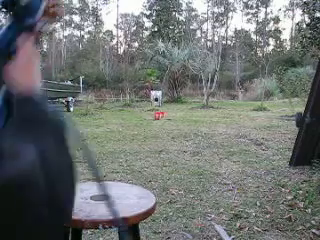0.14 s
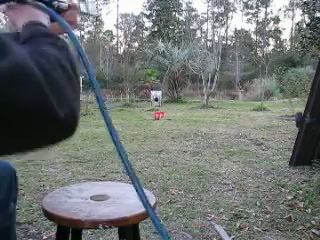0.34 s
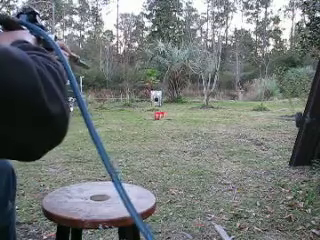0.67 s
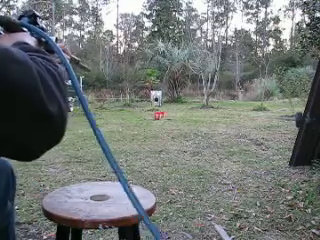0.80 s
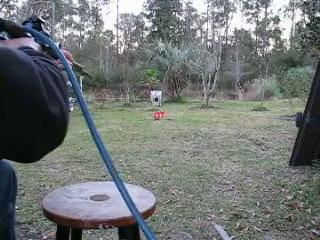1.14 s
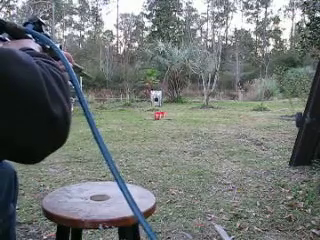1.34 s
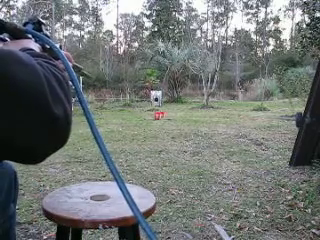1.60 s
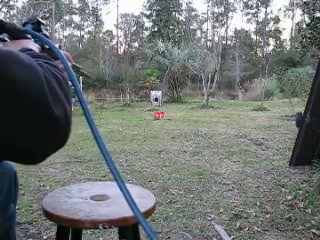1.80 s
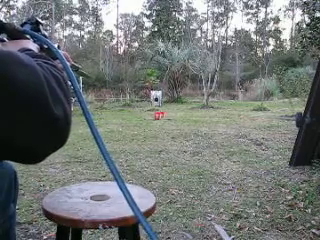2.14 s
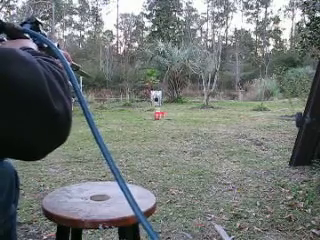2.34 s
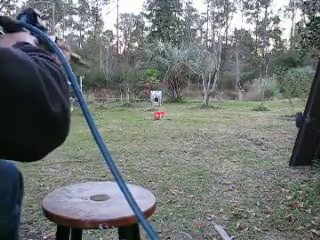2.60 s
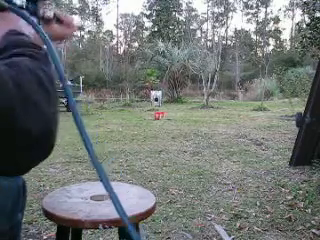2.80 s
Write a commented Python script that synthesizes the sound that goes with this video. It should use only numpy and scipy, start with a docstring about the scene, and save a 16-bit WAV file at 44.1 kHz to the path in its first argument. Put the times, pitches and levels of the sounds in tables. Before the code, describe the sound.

Air cannon shot: a crack and overloaded hissing burst, a hollow can knock, echo off trees

```python
"""A home-made air cannon fires: a crack, then a whistling jet of noise that overloads the capsules.
The shot strikes the ringing modes of a hollow can, which rolls away as a band of low noise.
Trees around the garden return a scattered noise echo that dulls with time.
Before the shot, sleeve noise rustles, the hose slips into its resonances and struck fittings tick.
Behind it all lie far traffic and leaves, as steady coloured noise, and two thin insect tones."""
import sys
import numpy as np
from scipy import signal
from scipy.io import wavfile

SR = 44100
rng = np.random.default_rng(int(sys.argv[2]) if len(sys.argv) > 2 else 0)


def voltage_ratio(level):
    """Linear amplitude factor for a level in decibels (scalar or array-like)."""
    return 10 ** (np.asarray(level, float) / 20)


def generate_wav(sig):
    """Save sig (samples, or channels by samples) to the path in sys.argv[1] as 16-bit PCM at SR."""
    pcm = np.round(np.clip(np.atleast_2d(sig).T, -1, 1) * 32767).astype(np.int16)
    wavfile.write(sys.argv[1], SR, pcm)


N = 130095
T = np.arange(N) / SR


def rms_one(x):
    """Scale to rms 1."""
    return x / np.sqrt(np.mean(x ** 2) + 1e-20)


def envelope(rows, edge_s=0.02):
    """Turn rows of (seconds, dB) into a gain over time, faded to silence outside the table."""
    s, db = np.transpose(rows)
    gate = np.clip(np.minimum(T - s[0] + edge_s, s[-1] + edge_s - T) / edge_s, 0, 1)
    return gate * voltage_ratio(np.interp(T, s, db))


def at_hz(points, hz):
    """Read a spectrum table on a log frequency axis."""
    table_hz, value = np.transpose(points)
    return np.interp(np.log(hz), np.log(table_hz), value)


def drift(rate):
    """Slow random wander of rms 1: noise through two equal low-pass poles, run at SR / 20."""
    r = np.exp(-40 * np.pi * rate / SR)
    white = rng.standard_normal(N // 20 + 3002)
    slow = signal.lfilter([1], [1, -2 * r, r * r], white)[3000:]   # drop the settling time
    return np.interp(np.arange(N) / 20, np.arange(len(slow)), rms_one(slow))


def resonance(x, hz, width_hz):
    """Two-pole resonance with a peak gain of 1."""
    r = np.exp(-np.pi * width_hz / SR)
    zeros = np.array([1, 0, -1]) * (1 - r * r) / 2
    return signal.lfilter(zeros, [1, -2 * r * np.cos(2 * np.pi * hz / SR), r * r], x)


def double_resonance(x, hz, width_hz):
    """The same resonance twice in a row, for steeper skirts."""
    return resonance(resonance(x, hz, width_hz), hz, width_hz)


def strike(times, db, modes, spread_db, contact_s):
    """Contacts of some length ring every mode (Hz, dB, t60 s), at new random strengths each time."""
    out = np.zeros(N)
    chance = rng.standard_normal((len(times), len(modes)))
    for k, (hz, mode_db, t60) in enumerate(modes):
        ring = np.full(N, 1e-18)
        ring[(np.asarray(times) * SR).astype(int)] = voltage_ratio(db + mode_db + spread_db * chance[:, k])
        w = 2 * np.pi * hz / SR
        for fall_s in (t60, contact_s):   # the second pass softens the onset
            r = voltage_ratio(-60 / (fall_s * SR))
            ring = signal.lfilter([1], [1, -2 * r * np.cos(w), r * r], ring) * np.sin(w)
        out += ring * (1 - r)
    return out


def panned(x, db):
    """Place a sound by left-right level difference; positive is left."""
    return x * voltage_ratio(np.array([[db / 2], [-db / 2]]))


def noise(colour, alike_table, patchy_db, rate, tilt=None, start_s=0):
    """Third-octave bands of stereo noise, each with level, flicker and likeness; about rms 1 untilted."""
    first = int(start_s * SR)
    out, power = np.zeros((2, N)), 0
    lowest, highest = colour[0][0], colour[-1][0]
    edges = lowest * 2 ** np.arange(0, np.log2(highest / lowest) + 1 / 3, 1 / 3)
    tops = np.minimum(edges[1:], 1.01 * highest)
    white = rng.standard_normal((2, 2, N - first))   # neighbouring bands use separate noises
    together = drift(rate / 2)
    for k, (low, high) in enumerate(zip(edges, tops)):
        band = signal.butter(3, [low, high], "band", fs=SR, output="sos")
        mid, side = signal.sosfilt(band, white[k % 2])
        hz = np.sqrt(low * high)
        alike = np.clip(at_hz(alike_table, hz), -1, 1)
        db = at_hz(colour, hz)
        power += voltage_ratio(2 * db) * (high - low) * 2 / SR
        flicker_db = patchy_db * (together + drift(rate))
        gain = voltage_ratio(db + flicker_db + (tilt(hz) if tilt else 0))[first:]
        stereo = np.sqrt((1 + alike) / 2) * mid + np.sqrt((1 - alike) / 2) * side * [[1], [-1]]
        out[:, first:] += gain * stereo
    return out / np.sqrt(power)


# Swell of the air jet before overload. Each row: time in seconds, level in dB.
JET = [(2.2598, -35), (2.261, -8), (2.3, -8), (2.374, -13), (2.39, -26), (2.6, -58)]
# Spectrum of the jet. Each row: frequency in Hz, relative level in dB per Hz.
JET_COLOUR = [(150, -11), (3400, -5), (6240, -0.5), (7900, 2), (10500, -19), (15600, -11.5)]
# Stereo likeness of the jet. Each row: frequency in Hz, left-right correlation (no unit).
JET_ALIKE = [(3000, 0.17)]


def jet():
    """Turbulent air rushing out: wide, fast-flickering coloured noise."""
    return envelope(JET, edge_s=0.00088) * noise(JET_COLOUR, JET_ALIKE, patchy_db=1.5, rate=80, start_s=2)


# Valve whistles. Each row: start in seconds, length in seconds, from Hz, to Hz, level in dB.
WHISTLES = [(2.261, .013, 7400, 6900, -8), (2.287, .0115, 6000, 12500, -3)]


def whistles():
    """Gliding sine tones of the valve, whose pitch bends more steeply towards the end."""
    out = np.zeros(N)
    for s, length, from_hz, to_hz, db in WHISTLES:
        u = np.clip((T - s) / length, 0, 1)
        hz = from_hz + (to_hz - from_hz) * u ** 1.8
        swell = np.sqrt(np.abs(np.sin(np.pi * u))) * (u < 1)
        out += voltage_ratio(db) * swell * np.sin(2 * np.pi * np.cumsum(hz) / SR)
    return out


# The jet sings in the barrel. Each row: start in seconds, length in seconds, frequency in Hz, level in dB.
BARREL = [(2.305, .085, 6020, -14), (2.325, 0.063, 4080, -15)]


def barrel():
    """Barrel resonances excited by noise, each swelling and fading once."""
    out = np.zeros((2, N))
    for s, length, hz, db in BARREL:
        swell = np.sqrt(np.sin(np.pi * np.clip((T - s) / length, 0, 1)).clip(0))
        out += voltage_ratio(db) * swell * rms_one(resonance(rng.standard_normal((2, N)), hz, width_hz=450))
    return out


# Air puffs on the two ports. Each row: start in seconds, length in seconds,
# left height and right height (amplitude before overload).
PUFFS = [(2.2795, .004, .4, -.35), (2.289, .024, -.1, .02)]


def puffs():
    """Smooth pressure bumps of air striking the microphone ports."""
    out = np.zeros((2, N))
    for s, length, left, right in PUFFS:
        out += np.outer([left, right], np.sin(np.pi * np.clip((T - s) / length, 0, 1)) ** 2)
    return out


def crack():
    """Crack of the valve opening: one brief contact rings a bright and a weaker low mode."""
    modes = [(7200, 0, 0.005), (900, -12, 0.01)]   # Hz, dB, t60 s
    return strike([2.2603], 5, modes, spread_db=0, contact_s=0.001)


def blast():
    """The rush saturates the capsules along a tanh curve; the crack is added on top."""
    rush = jet() + whistles() + barrel() + puffs()
    overload_top = 0.7   # amplitude
    return overload_top * np.tanh(rush / overload_top) + crack()


# The shot knocks the can. Each row: time in seconds, hit strength in dB.
KNOCKS = [(2.376, -4), (2.398, -5.5)]
# Ringing modes of the can. Each row: frequency in Hz, relative strength in dB, t60 in seconds.
CAN = [(330, -16, 0.064), (454, -0.5, 0.062), (511, 4, 0.042), (800, -2.5, 0.03), (2604, 10, 0.012),
       (3020, 4, 0.011)]
# The can rolls away. Each row: time in seconds, level in dB.
ROLL = [(2.41, -29.5), (2.51, -32)]


def can():
    """Hits ring the modes of a hollow can; its rolling is noise in a low resonance."""
    roll = rms_one(double_resonance(rng.standard_normal(N), hz=450, width_hz=270))
    s, db = np.transpose(KNOCKS)
    knocks = strike(s, db, CAN, spread_db=3, contact_s=0.012)
    low_cut = signal.butter(2, 170, "high", fs=SR, output="sos")
    return envelope(ROLL) * roll + signal.sosfilt(low_cut, knocks)


# Stereo likeness of trees, sleeve and garden. Each row: frequency in Hz, left-right correlation (no unit).
ALIKE = [(60, 0.99), (380, 0.99), (1400, 0.63), (4000, 0.05)]
# Echo off the trees. Each row: time in seconds, level in dB.
TREES = [(2.39, -15.5), (2.44, -26.5), (2.55, -26.5), (2.66, -25), (2.95, -37)]
# Spectrum of the echo at COLOUR_S. Each row: frequency in Hz, relative level in dB per Hz.
TREES_COLOUR = [(150, -13), (500, -19), (1090, -8), (1660, -6.5), (7800, -14.5), (10300, -43.5),
                (15500, -50)]
COLOUR_S, DULLS_DB_PER_S_OCT2, PIVOT_HZ = 2.533, -7, 1450
# Thicker trees answer louder. Each row: time in seconds, boost in dB before its onset and fall.
CLUMPS = [(2.596, 7.8), (2.641, 5.9), (2.745, 3.7)]
CLUMP_FALL_S, CLUMP_HZ = 0.042, 1720
GROUND_HZ, GROUND_SHARE = 542.4, 0.21   # the ground bounce combs the echo near multiples of GROUND_HZ


def trees():
    """Scattered noise echo, duller the later it comes, with a ground bounce and louder clumps."""
    def dulling(hz):
        octaves_up = max(np.log2(hz / PIVOT_HZ), 0)
        return DULLS_DB_PER_S_OCT2 * (T - COLOUR_S) * octaves_up ** 2

    echo = noise(TREES_COLOUR, ALIKE, patchy_db=0.8, rate=40, tilt=dulling, start_s=2)
    echo = echo + GROUND_SHARE * np.roll(echo, int(SR / GROUND_HZ), axis=1)
    boost_db = np.zeros(N)
    for s, db in CLUMPS:
        onset = np.clip((T - s) * 200, 0, 1)   # 5 ms
        boost_db += db * onset * np.exp(-np.abs(T - s) / CLUMP_FALL_S)
    echo = echo + (voltage_ratio(boost_db) - 1) * resonance(echo, CLUMP_HZ, CLUMP_HZ / 2)
    return panned(envelope(TREES) * echo, -1)


# Hose drags. Each row: time in seconds, level in dB.
HOSE = [(.34, -46), (.47, -39), (.535, -34), (.62, -39), (.68, -49.5), (.78, -62.5)]
# Body resonances of the hose. Each row: frequency in Hz, width in Hz, relative level in dB.
HOSE_BODY = [(174, 9, -2.5), (1030, 240, -17.5), (1526, 97, -7), (1778, 69, -5.5)]
# Treble resonances of the hose. Each row: frequency in Hz, width in Hz per pass, relative level in dB.
HOSE_TREBLE = [(3380, 1200, -5.5), (4760, 480, -12.5), (6400, 2000, -11)]
SLIPS_PER_S, SLIP_SPREAD_DB = 2200, 4.5


def hose():
    """Random slips of uneven strength excite the body and the flickering treble of the hose."""
    slip_db = SLIP_SPREAD_DB * np.minimum(rng.exponential(1, N), 3) + 2 * drift(120)
    slips = (rng.random(N) < SLIPS_PER_S / SR) * voltage_ratio(slip_db) * rng.choice([-1, 1], N)
    body, treble = np.zeros(N), np.zeros(N)
    for k, (hz, width, db) in enumerate(HOSE_BODY):
        body += voltage_ratio(db) * (-1) ** k * resonance(slips, hz, width)
    for hz, width, db in HOSE_TREBLE:
        treble += voltage_ratio(db + 2 * drift(71)) * rms_one(double_resonance(slips, hz, width))
    return envelope(HOSE) * (rms_one(body) + treble)


# The hose snags. Each row: time in seconds, hit strength in dB.
SNAGS = [(.5275, -11), (.539, -14), (.571, -17)]


def snags():
    """Sudden catches ring the hose resonances, wider ones dying faster."""
    s, db = np.transpose(SNAGS)
    modes = [(hz, mode_db, 3.0 / width) for hz, width, mode_db in [*HOSE_BODY[1:], *HOSE_TREBLE]]
    return strike(s, db, modes, spread_db=2, contact_s=0.002)


# Ticking fittings. Each row: time in seconds, hit strength in dB before a 3 dB trim.
TICKS = [(0.235, -27.5), (0.3096, -16), (0.3316, -10), (0.415, -31), (0.5378, -12.5), (0.6758, -29.5),
         (0.689, -27), (0.7323, -26.5), (0.815, -32.5), (0.9245, -37), (2.85, -20.5)]
# Modes of the fittings. Each row: frequency in Hz, relative strength in dB.
FITTING_HZ_DB = [(1800, -1), (3000, 4.5), (4800, 2), (7400, 2.5), (11000, -15)]


def fittings():
    """Small hard contacts ring short, bright modes."""
    s, db = np.transpose(TICKS)
    modes = [(hz, mode_db, 0.0022) for hz, mode_db in FITTING_HZ_DB]   # t60 2.2 ms
    return strike(s, db - 3, modes, spread_db=3, contact_s=0.002)


# A brushed hollow tube. Each row: frequency in Hz, width in Hz, level in dB at time zero.
TUBE = [(806, 44, -34.5)]


def tube():
    """Noise in the tube resonance, dying away from the start by 60 dB in 0.36 s."""
    out = np.zeros(N)
    for hz, width, db in TUBE:
        out += voltage_ratio(db - 60 * T / 0.36) * rms_one(resonance(rng.standard_normal(N), hz, width))
    return out


# Dull shuffle. Each row: time in seconds, level in dB.
SHUFFLE = [(.75, -54.5), (1.05, -50), (1.25, -55.5)]


def shuffle():
    """Soft rubbing as noise in a low resonance."""
    rub = double_resonance(rng.standard_normal(N), hz=437, width_hz=215)
    return envelope(SHUFFLE) * rms_one(rub)


# Sleeve rustle. Each row: time in seconds, level in dB.
SLEEVE = [(0, -33), (.09, -44), (.33, -41), (.7, -48), (1.3, -100)]
# Spectrum of the cloth. Each row: frequency in Hz, relative level in dB per Hz.
SLEEVE_COLOUR = [(500, -24), (800, -7), (1600, -0.5), (2600, -6), (3400, -24.5), (8000, -23.5),
                 (14000, -63)]


def sleeve():
    """Rubbing cloth as coloured stereo noise."""
    return envelope(SLEEVE) * noise(SLEEVE_COLOUR, ALIKE, patchy_db=0.0, rate=28)


def handling():
    """Hose, tube, shuffle and fittings sit slightly right; the sleeve spreads around the centre."""
    near = hose() + tube() + shuffle() + fittings() + snags()
    return panned(near, -2) + sleeve()


# Far traffic and leaves. Each row: frequency in Hz, relative level in dB per Hz.
GARDEN = [(25, -32), (50, -4.5), (125, 0), (300, -15), (1100, -12), (2100, -18.5), (3300, -30.5),
          (8000, -37.5), (10500, -49), (15500, -42)]
# Insect tones. Each row: frequency in Hz, amplitude in dB before flutter.
INSECTS = [(8275, -67), (9300, -78)]


def garden():
    """Steady coloured noise, and two thin insect tones that waver in pitch and level."""
    out = voltage_ratio(-46) * noise(GARDEN, ALIKE, patchy_db=0.5, rate=6.7)
    for hz, db in INSECTS:
        phase = 2 * np.pi * np.cumsum(hz + 25 * drift(90)) / SR
        flutter = voltage_ratio(2 * drift(40))
        out += voltage_ratio(db) * flutter * np.sin(phase + np.array([[0], [1.5]]))   # right leads by 1.5 rad
    return out


def scene():
    """Sum of all sources."""
    return blast() + can() + trees() + handling() + garden()


def band_limit(x):
    """A steep low-pass at the top of the band."""
    return signal.sosfilt(signal.butter(12, 15700, fs=SR, output="sos"), x)


def record(dry):
    """A steep top cut, then hard clipping at full scale."""
    top_cut = signal.cheby2(10, 40, 15800, fs=SR, output="sos")
    mix = np.clip(signal.sosfilt(top_cut, dry), -1, 1)
    return band_limit(mix)


dry = scene()
out = record(dry)
generate_wav(out)
```